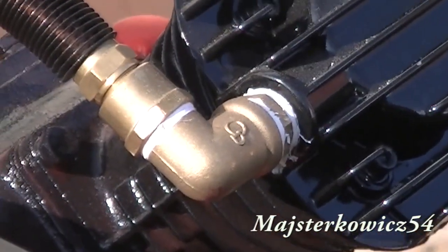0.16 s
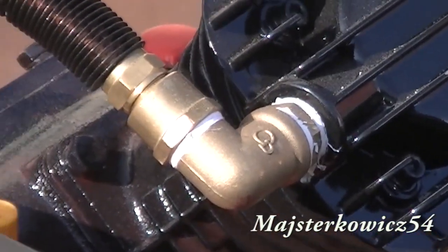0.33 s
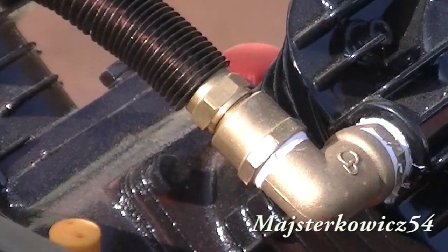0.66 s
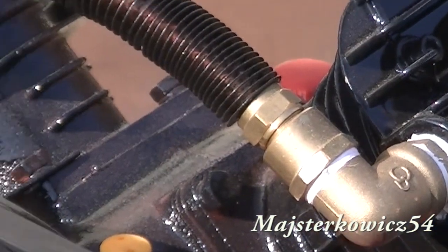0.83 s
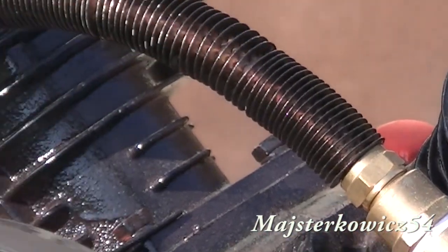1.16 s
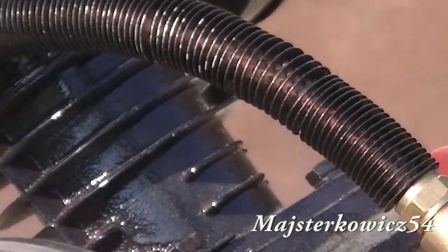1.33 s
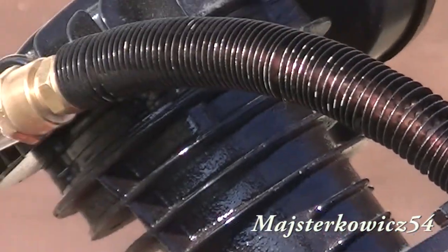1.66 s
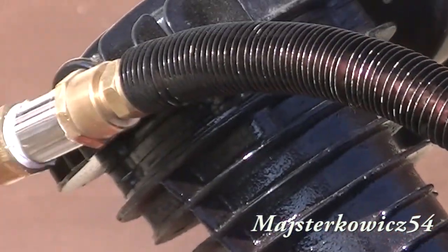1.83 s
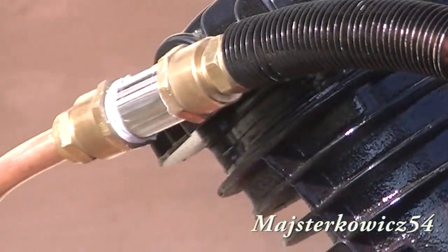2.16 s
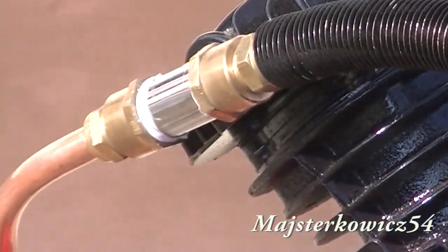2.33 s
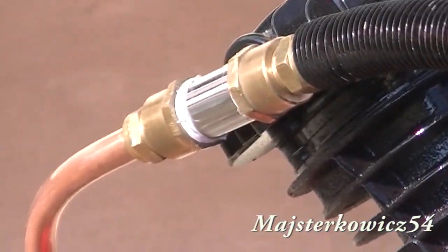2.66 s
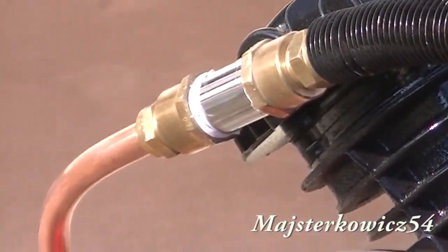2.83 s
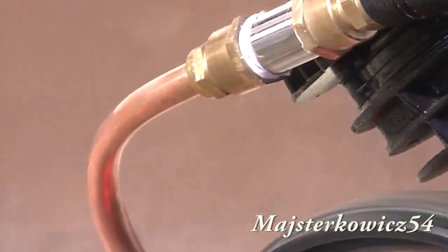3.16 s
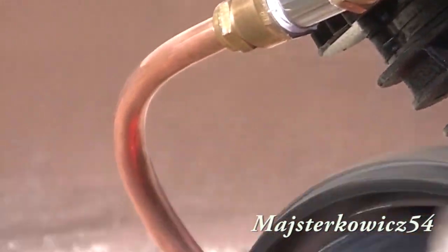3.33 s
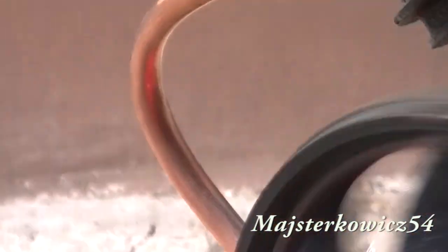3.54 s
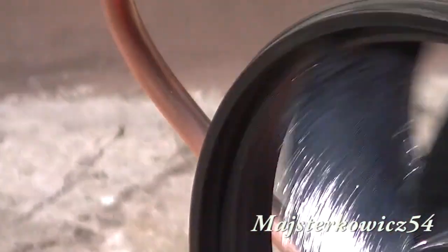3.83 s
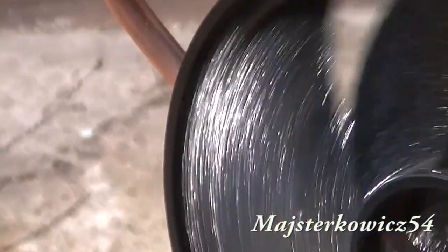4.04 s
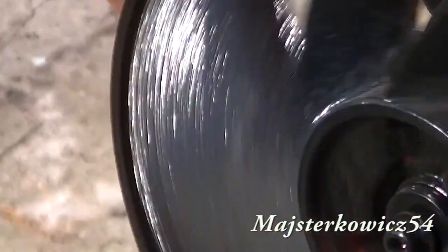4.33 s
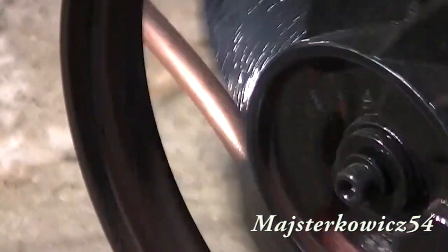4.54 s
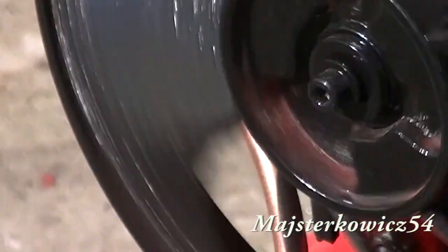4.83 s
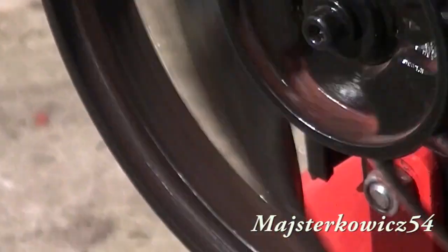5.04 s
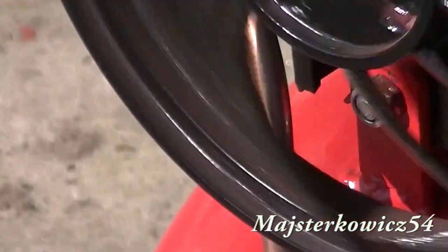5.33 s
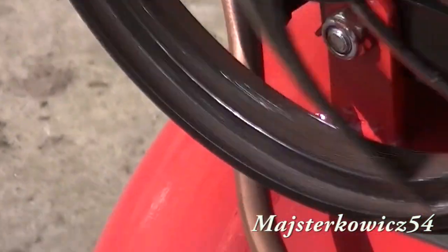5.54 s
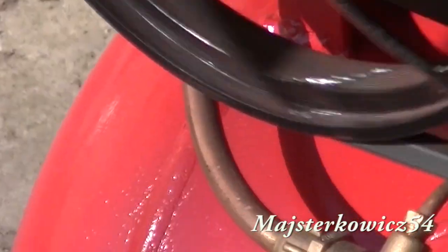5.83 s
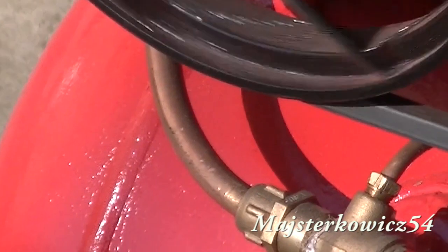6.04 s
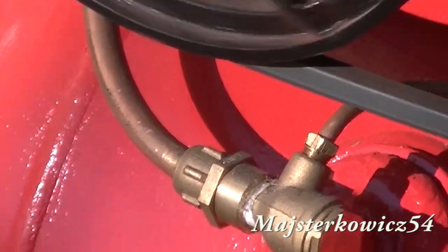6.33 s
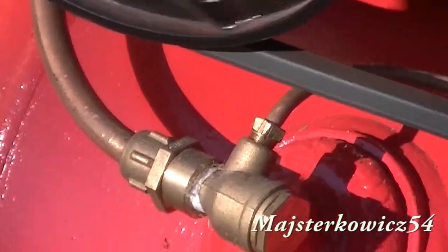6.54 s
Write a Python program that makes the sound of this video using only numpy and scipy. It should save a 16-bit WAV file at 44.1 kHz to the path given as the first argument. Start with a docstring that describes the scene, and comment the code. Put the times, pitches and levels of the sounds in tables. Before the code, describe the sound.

A belt-driven piston air compressor runs steadily, with fast, even chugging, ticking valves and a motor drone.

```python
"""A belt-driven piston compressor fills its tank outdoors. Its puffs and knocks repeat at every crank
turn, so they form a harmonic series, with peaks in its tone and a dip where two puffs cancel.
Once a turn the valve plates slap, hiss, tick and ring. Behind them the electric drive drones and
whines, and flywheel air rushes. The cylinder heads ring less as the listener moves down to the tank."""
import sys
import numpy as np
from scipy.fft import rfft, irfft, next_fast_len
from scipy.io import wavfile
from scipy.ndimage import map_coordinates

SR = 44100
rng = np.random.default_rng(int(sys.argv[2]) if len(sys.argv) > 2 else 0)


def bounce(signal):
    """Save signal as a 16-bit WAV file at the path given by the first command-line argument."""
    frames = np.transpose(np.atleast_2d(signal))
    limited = np.clip(frames, -1, 1)
    pcm = np.round(limited * 32767).astype(np.int16)
    wavfile.write(sys.argv[1], SR, pcm)


N = 295029
TIME = np.arange(N) / SR
CRANK_HZ, DRONE_HZ, WHINE_HZ, TOP_HZ = 18.7476, 626.1, 2044, 11900

# nearness of the machine, used about its mean: t/s, level/dB
NEARNESS = [(0, -23.5), (0.75, -22.5), (2.1, -24.0), (2.8, -23), (3.3, -23.5), (3.75, -24), (4.3, -25),
            (5.2, -23.0), (5.8, -23.0), (6.69, -23)]
# spectrum of air rush and loose rattle: f/Hz, density/(dB per Hz)
AIR_SPECTRUM = [(25, -80.5), (150, -83.5), (250, -74), (380, -75), (560, -62.5), (850, -63), (1200, -57.5),
                (1500, -61.5), (1950, -58.5), (3100, -62.5), (5300, -72), (7500, -81), (10000, -87),
                (11700, -103)]
# resonances of fins and guards: f/Hz, width/Hz, gain/dB
GUARD_MODES = [(435, 30, 7), (1160, 60, 2), (1365, 35, 5), (1640, 30, 5), (1872, 20, 9), (2860, 60, 2),
               (3040, 20, 4)]
# faint steady tones of motor and belt: f/Hz, level/dB
HUM_TONES = [(550, -50), (574, -47), (599, -51), (637, -44.5), (675, -50)]
# rise and fall of the whine, used about its mean: t/s, level/dB
WHINE_SWELL = [(0, -47), (0.2, -33), (0.7, -34.5), (1.95, -36), (2.15, -47), (2.5, -41), (2.75, -32.5),
               (3, -32.5), (3.7, -41), (6.69, -34)]
# the plate slaps, air follows, the plate closes: position/turns, level/dB, T60/s
SLAP_BLOWS = [(.015, 9.5, .028), (.12, -2.5, 0.092), (.43, 1, .025)]
# spectrum of the slap: f/Hz, density/(dB per Hz)
SLAP_SPECTRUM = [(500, -91), (1500, -65.5), (2850, -59), (3550, -57), (4100, -66.5), (5350, -58.5),
                 (6100, -71.5), (7350, -68), (7900, -77.5), (9900, -71), (10700, -80), (11700, -106)]
# dips and a peak that the valve seat gives the slap: f/Hz, width/Hz, gain/dB
SEAT_COLOUR = [(3880, 190, -14.5), (5180, 170, -6.5), (8570, 150, 11.5)]
# the lighter valve ticks and bounces: position/turns, level/dB, T60/s
TICK_BLOWS = [(0.752, 8.5, 0.021), (.84, 2, 0.019), (0.915, 5, 0.024), (0.0077, 4.5, 0.012)]
# spectrum of the tick: f/Hz, density/(dB per Hz)
TICK_SPECTRUM = [(3000, -90), (6000, -72), (7400, -75.5), (8800, -71.5), (9400, -70), (9750, -69),
                 (10350, -76), (11000, -80), (11700, -97)]
# modes of the slapped valve plate: f/Hz, level/dB, T60/s
PLATE_MODES = [(2853, -23.5, 0.064), (3447, -32.5, 0.13), (3720, -31, 0.1), (4400, -34, 0.11),
               (4800, -35, 0.13), (5310, -24.5, 0.026), (5570, -34, 0.034), (6660, -37.5, 0.13),
               (7380, -36, 0.039), (9695, -30.5, 0.054), (9880, -35, 0.039)]
# puffs and knocks within a turn: position/turns, length/turns, f/Hz, width/Hz, weight/dB
STROKE_PULSES = [(.09, .07, 290, 180, 1), (.375, .07, 290, 180, 1), (.42, .2, 505, 70, 3),
                 (.8, .17, 640, 110, 0), (.88, .12, 950, 250, 0), (.23, .07, 1180, 170, 14),
                 (.15, .04, 1370, 130, -2), (.37, .1, 1370, 110, 6), (.93, .07, 1370, 130, -2),
                 (.36, .04, 1950, 600, 0), (.64, .04, 2100, 500, -2), (.99, .09, 2000, 700, 0)]
# spectral envelope of the crank harmonics: f/Hz, level/dB
PUMP_SPECTRUM = [(20, -88), (110, -92), (150, -71), (200, -69.5), (245, -57.5), (310, -50), (420, -56.5),
                 (540, -50.5), (780, -53), (880, -52), (1450, -48.5), (1700, -53.5), (2250, -50.5),
                 (2700, -83.5), (4500, -82)]
# peaks in the pump's tone, and a dip where the two puffs of each turn cancel: f/Hz, width/Hz, gain/dB
PUMP_COLOUR = [(337, 12, -12), (506, 14, 10), (620, 20, 5), (1152, 42, 12.5), (1200, 16, 13), (1305, 25, 4),
               (1368, 46, 11.5), (1931, 14, 6.5), (2193, 12, 9.5)]
# resonances of the cylinder heads: f/Hz, width/Hz, gain/dB
HEAD_MODES = [(994, 5.3, 13), (1026, 14.4, 13)]


def amp(db):
    return 10 ** (np.asarray(db) / 20)


def envelope_db(points, hz):
    """A spectral envelope, interpolated on a logarithmic frequency axis."""
    f, db = np.transpose(points)
    return np.interp(np.log(hz + 1), np.log(f + 1), db)


def bells_db(bands, hz):
    """Each band adds a bell-shaped peak or dip to the spectrum."""
    return sum(db * np.exp(-2 * ((hz - centre) / width) ** 2) for centre, width, db in bands)


def swing_db(curve):
    """A level over time, relative to the mean of its points."""
    t, db = np.transpose(curve)
    return np.interp(TIME, t, db - db.mean())


def wobble(rate):
    """Smooth random modulation with rate knots a second."""
    return map_coordinates(rng.standard_normal(int(N * rate / SR) + 4), [TIME * rate], mode='nearest')


def filtered(x, response):
    """Linear filtering: the spectrum is multiplied by a frequency response."""
    size = next_fast_len(N + SR // 2)
    return irfft(rfft(x, size) * response(np.fft.rfftfreq(size, 1 / SR)), size)[:N]


def cast_iron_db(hz, spacing_hz=38, depth_db=2.8):
    """High modal density: the castings' countless close modes ripple the spectrum."""
    ripple = map_coordinates(rng.standard_normal(SR // 20), [hz / spacing_hz], mode='nearest')
    return depth_db * np.tanh(ripple)


def casting_noise(spectrum, bands=()):
    """Source and filter: white noise is coloured by an envelope, peaks and dips, and the castings."""
    white = rng.standard_normal(N) * np.sqrt(SR / 2)
    colour = lambda hz: amp(envelope_db(spectrum, hz) + bells_db(bands, hz) + cast_iron_db(hz))
    return filtered(white, colour)


def air_rush():
    """Broadband excitation: flywheel air and loose rattle ring in the fins and guards."""
    return casting_noise(AIR_SPECTRUM, GUARD_MODES) * amp(0.93 * wobble(250) + 0.86 * wobble(12))


def tone(hz, db, waver_rad):
    """Phase modulation: a complex tone wavers with the belt load."""
    drift = waver_rad * (wobble(2.77) + .5 * wobble(25))
    return np.sqrt(2) * amp(db) * np.exp(1j * (2 * np.pi * hz * TIME + drift))


def electric_drive(crank, near_db):
    """Modulation by load: the piston swells the drone once a turn, beside a hum and an unsteady whine."""
    load = 1 + .38 * np.exp(2j * np.pi * (crank - .78))
    drone = tone(DRONE_HZ, db=-31.5, waver_rad=0.41) * load * amp(1.7 * wobble(70))
    hum = sum(tone(hz, db, waver_rad=0.53) for hz, db in HUM_TONES)
    whine = tone(WHINE_HZ, db=-38, waver_rad=.55) * amp(2.4 * wobble(40))
    return np.real(amp(near_db) * (drone + hum) + amp(swing_db(WHINE_SWELL)) * whine)


def blow_envelope(blows, crank, attack_s, scatter_db):
    """Incoherent blows add in power; each decays from its crank position, its force varying by turn."""
    power = 0
    for position, db, t60 in blows:
        turn, fraction = np.divmod(crank - position + 1, 1)
        age = fraction / CRANK_HZ
        force_db = db + scatter_db * rng.standard_normal(N // 100)[turn.astype(int)]
        power += (amp(force_db - 60 * age / t60) * (1 - np.exp(-age / attack_s))) ** 2
    return np.sqrt(power)


def valves(crank):
    """Impact and flow noise: one plate slaps and passes air; a lighter one ticks a quarter turn earlier."""
    slap = casting_noise(SLAP_SPECTRUM, SEAT_COLOUR)
    slap *= blow_envelope(SLAP_BLOWS, crank, attack_s=0.0017, scatter_db=1.1)
    tick = casting_noise(TICK_SPECTRUM)
    tick *= blow_envelope(TICK_BLOWS, crank, attack_s=.0011, scatter_db=1.2)
    flutter = amp(0.75 * wobble(700) - 2.5)  # the plates chatter on their seats
    return (slap + tick) * flutter


def plate_ring(crank, lowest_mode_db, scatter_db=2.5, attack_s=0.0028):
    """Damped free vibration: each slap rings the modes of the valve plate afresh."""
    turn, age = np.floor(crank).astype(int), crank % 1 / CRANK_HZ
    rings = []
    for hz, db, t60 in PLATE_MODES:
        force, phase = rng.standard_normal((turn.max() + 1, 2))[turn].T
        fade = amp(db + scatter_db * force - 60 * age / t60) * (1 - np.exp(-age / attack_s))
        rings.append(fade * np.sin(2 * np.pi * (hz * age + phase)))
    return amp(lowest_mode_db) * rings[0] + sum(rings[1:])


def piston_strokes(crank, head_db, smear_db=-10, size=2048):
    """Periodic excitation: puffs and knocks that recur every turn sound as harmonics of the crank."""
    cycle, hz = np.arange(size) / size, np.arange(size // 2 + 1) * CRANK_HZ
    head_lift_db = bells_db(HEAD_MODES, hz)
    level_db = envelope_db(PUMP_SPECTRUM, hz) + bells_db(PUMP_COLOUR, hz) + head_lift_db
    strength = amp(level_db) * size / np.sqrt(2)
    harmonics = strength * np.exp(2j * np.pi * rng.random(len(hz)))
    # each pass shifts only the phases, gathering the turn's energy into the pulses
    for _ in range(4):
        force = amp(smear_db) * harmonics / np.abs(harmonics)
        for position, length, centre, width, db in STROKE_PULSES:
            offset = (cycle - position + .5) % 1 - .5
            window = np.exp(-.5 * (offset / length) ** 2)
            band = 1 / (1 + (2 * (hz - centre) / width) ** 4)
            burst = band * rfft(window * irfft(harmonics))
            force += amp(db) * burst * np.linalg.norm(band) / np.linalg.norm(burst)
        harmonics = strength * np.exp(1j * np.angle(force))
    head_share = 1 - amp(-head_lift_db)
    repeat = lambda spectrum: map_coordinates(irfft(spectrum), [crank % 1 * size], mode='grid-wrap')
    return repeat(harmonics * (1 - head_share)) + amp(head_db) * repeat(harmonics * head_share)


def scene():
    """Superposition: pump, valves and drive share one crank, and their levels follow the nearness."""
    near_db = swing_db(NEARNESS)
    head_db = np.interp(TIME, [2.7, 3.4], [4, -1.5])  # the listener leaves the cylinder heads
    belt_give = 0.00386 * wobble(2) + 0.00064 * wobble(22)
    crank = .115 + CRANK_HZ * TIME + belt_give  # in turns
    pump = piston_strokes(crank, head_db) * amp(0.54 * wobble(24)) + air_rush()
    plates = valves(crank) + plate_ring(crank, lowest_mode_db=.4 * head_db)
    return (amp(near_db) * pump + amp(0.63 * near_db) * plates + electric_drive(crank, near_db))[None]


def record(dry):
    """Band limiting: an ideal low-pass filter passes nothing above TOP_HZ."""
    return filtered(dry[0], lambda hz: hz < TOP_HZ)[None]


dry = scene()
out = record(dry)
bounce(out)
```